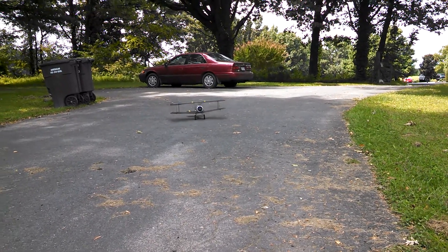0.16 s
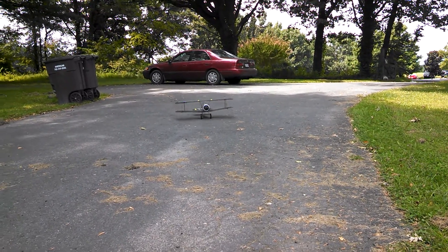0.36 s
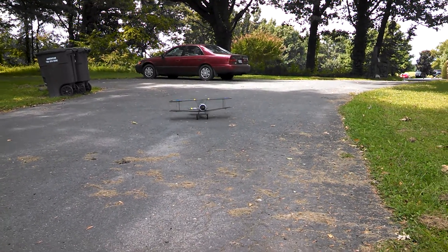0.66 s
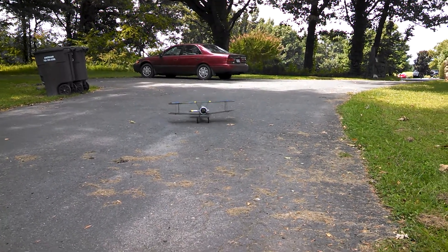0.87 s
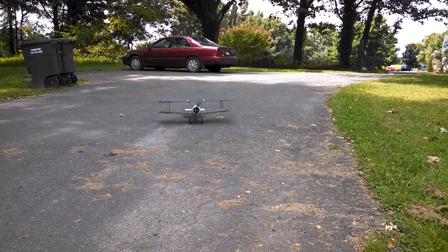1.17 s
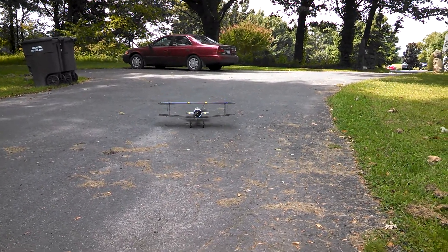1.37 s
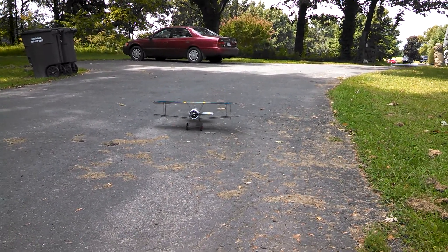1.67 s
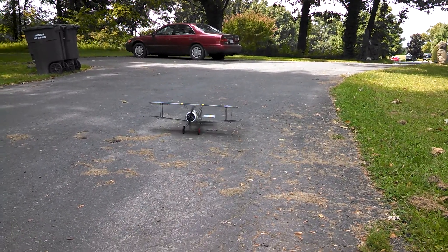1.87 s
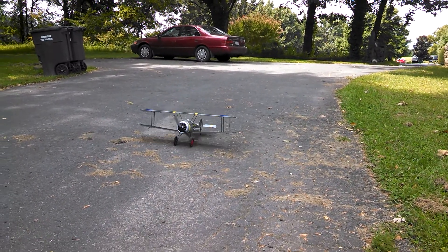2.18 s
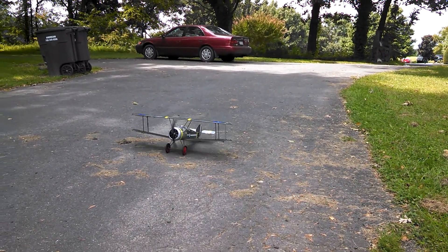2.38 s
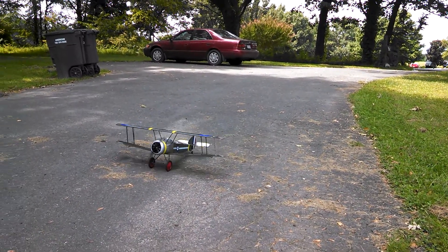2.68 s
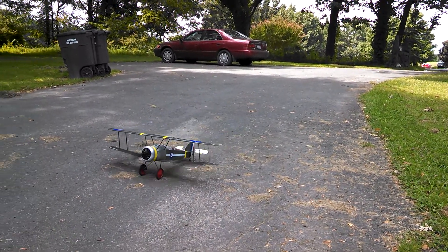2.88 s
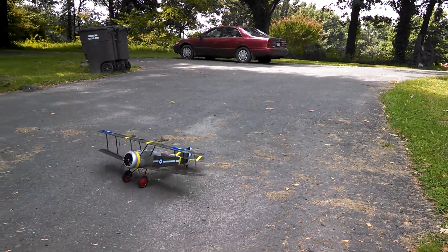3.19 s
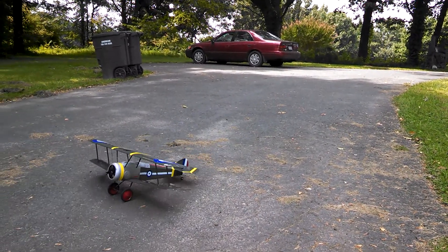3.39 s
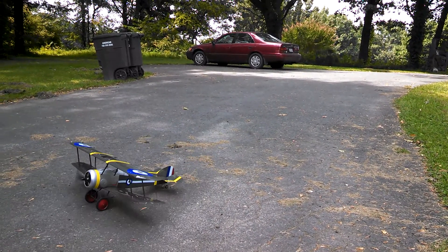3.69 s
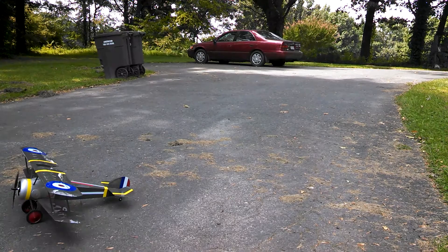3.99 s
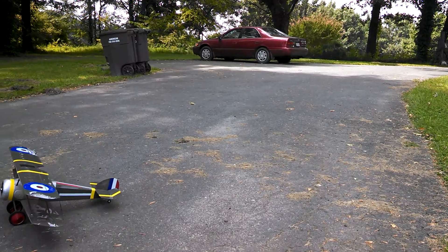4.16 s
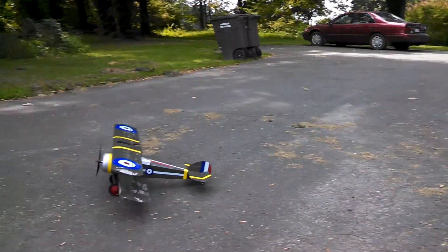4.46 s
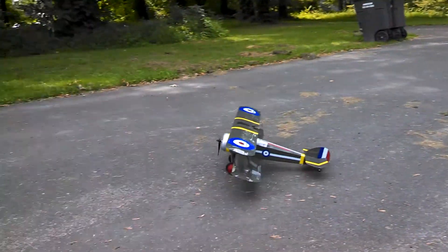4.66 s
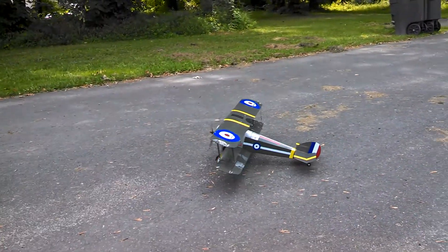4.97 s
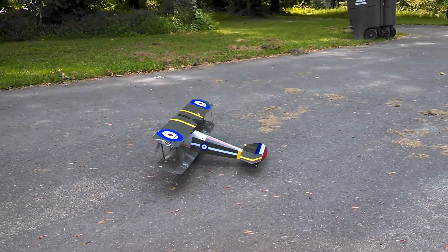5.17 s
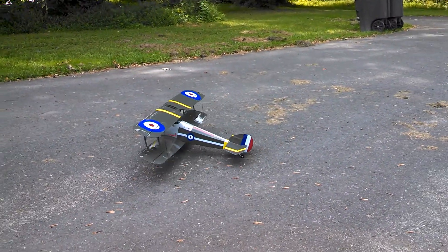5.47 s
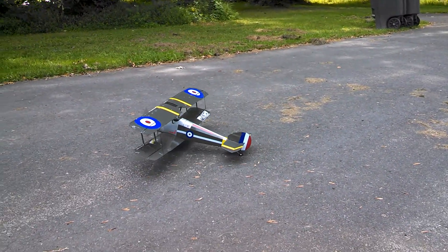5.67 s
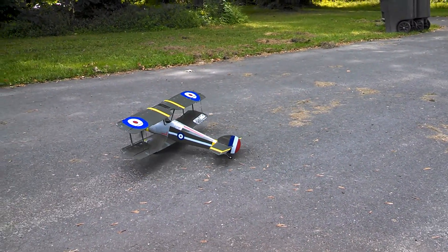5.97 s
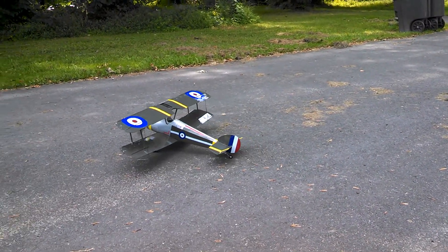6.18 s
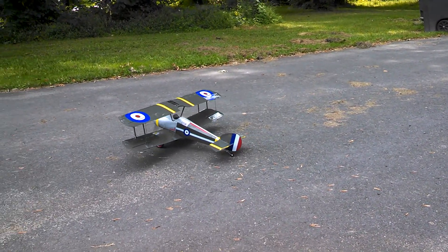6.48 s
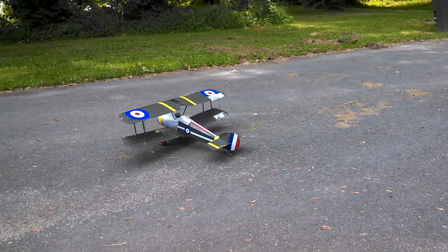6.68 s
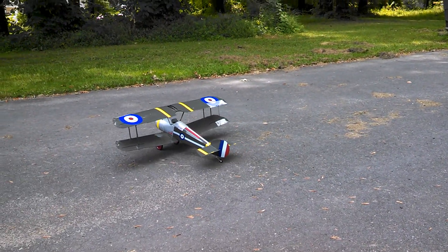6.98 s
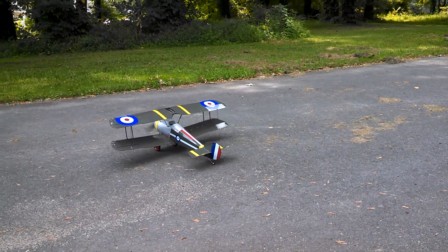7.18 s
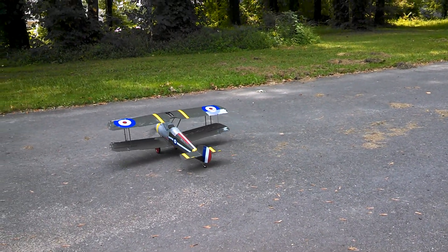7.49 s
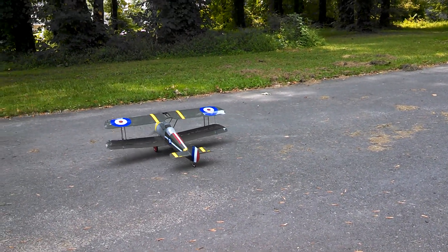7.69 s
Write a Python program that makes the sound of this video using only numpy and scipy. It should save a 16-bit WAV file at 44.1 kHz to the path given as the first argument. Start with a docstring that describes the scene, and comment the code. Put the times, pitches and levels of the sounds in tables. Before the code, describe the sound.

Toy-size propeller aircraft taxis closer and turns, thin steady whistle over wavering motor hum, amid sizzling insects, low wind thumps and two dry clicks.

```python
"""Electric model biplane taxiing

A model biplane taxis up a driveway and turns past a camera: its motor hums in slot and pole orders,
its speed controller whistles, propeller wash flaps on the wings and wheel bumps ring the light airframe.
Insects sizzle, one cicada pulses, another drones; wind rumbles on the microphone, two knocks hit the camera.
Gain control ducks the whole scene when the level passes a threshold, then lets it back slowly."""
import sys
import numpy as np
from scipy import signal
from scipy.fft import rfft, irfft, next_fast_len
from scipy.io import wavfile
from scipy.ndimage import uniform_filter1d

SR = 44100
rng = np.random.default_rng(int(sys.argv[2]) if len(sys.argv) > 2 else 0)


def waveform_to_disk(signal):
    """Save audio, clipped to [-1, 1], as 16-bit WAV at the path in sys.argv[1]."""
    frames = np.transpose(np.atleast_2d(signal))
    scaled = np.clip(frames, -1, 1) * 32767
    samples = np.round(scaled).astype(np.int16)
    wavfile.write(sys.argv[1], SR, samples)


N = 346185
TIME_S = np.arange(N) / SR

# levels in the tables are relative: filters, trims and gain control follow

# motor shaft rate: t/s, f/Hz
SHAFT_HZ = [(0.0, 31.3), (0.2, 31.0), (0.43, 27.3), (0.74, 33.3), (0.88, 29.6), (1.142, 30.4),
            (1.287, 27.6), (1.5, 26.3), (2.06, 14.6), (2.315, 23.3), (2.504, 29.6), (2.7, 32.5),
            (3.03, 34.3), (3.5, 26.6), (3.836, 25.2), (4.141, 28.7), (4.4, 30.3), (5.328, 29.9),
            (6.3, 31.8), (6.42, 37.4), (6.605, 40.6), (6.785, 41.7), (7.847, 37.9)]
# motor hum: t/s, level/dB
HUM_DB = [(0.0, -54), (0.45, -50.5), (0.8, -54), (1.1, -50), (1.38, -44), (1.55, -54), (2.25, -58),
          (2.42, -48), (2.58, -43), (3.1, -44), (3.45, -51.5), (3.9, -60), (4.12, -39.5), (4.4, -41),
          (5.0, -40.5), (5.46, -40.5), (5.8, -50), (6.24, -46.5), (6.34, -35.5), (6.5, -38), (6.65, -39),
          (7.0, -43), (7.85, -41.5)]
# hum orders, 12 slots and 14 poles: multiple of shaft rate, level/dB slow, level/dB fast
HUM_ORDERS = [(12, -9, -9.5), (13, -19, -6.5), (14, -4.5, -7), (16, -8, -24), (24, -30, -21),
              (28, -27, -14), (36, -3.5, -3), (42, -3.5, -16)]
# controller switching whistle: t/s, f/Hz
SWITCHING_HZ = [(0, 7792), (.95, 7820), (2, 7822), (2.8, 7794), (4.4, 7780), (6.3, 7776), (6.7, 7764),
                (7.85, 7761)]
# whistle as the aircraft turns: t/s, level/dB
WHISTLE_DB = [(0.0, -33), (0.42, -28.5), (0.7, -30.5), (0.87, -36), (1.35, -34.5), (1.68, -48), (1.96, -64),
              (2.1, -40), (2.38, -29), (2.5, -39), (2.62, -30), (2.9, -22), (3.2, -26.5), (3.35, -30.5),
              (3.47, -33), (3.58, -32), (3.72, -32), (3.95, -20.5), (4.12, -26), (4.25, -21), (4.4, -22.5),
              (4.55, -32), (4.75, -31), (4.9, -25), (5.03, -22.5), (5.14, -31.5), (5.28, -29),
              (5.74, -29.5), (5.95, -35), (6.44, -33), (6.75, -24.5), (7.05, -17), (7.28, -22),
              (7.6, -30.5), (7.84, -39)]
# rotor sidebands of the whistle: offset in shaft multiples, level/dB
ROTOR_SIDEBANDS = [(-21, -51), (4, -54), (14, -57), (42, -53)]
# sideband strength: t/s, level/dB
SIDEBAND_DB = [(0, -13), (1.9, -17), (2.3, 10), (3, 1), (4, -2), (4.5, -8), (6.2, 3), (6.8, 1), (7.85, -4)]
# nearness of the aircraft, heard in its wash: t/s, level/dB
NEARNESS_DB = [(0, -23), (2.0, -9.5), (3.2, 3.5), (4.2, 3), (5.5, -3.5), (6.7, -17), (7.85, -8.5)]
# propeller wash colour: f/Hz, level/dB
WASH_COLOUR = [(200, -9), (360, 3.5), (480, 6.5), (620, 2.5), (850, -9.5), (2000, -53), (4000, -90)]
# wheels rolling on asphalt: t/s, level/dB
ROLL_DB = [(0.0, -46), (0.45, -42.5), (1.0, -39), (1.9, -38), (2.5, -43.5), (3.15, -41.5), (3.7, -53),
           (4.25, -45), (4.95, -45.5), (5.3, -51), (6.2, -50), (6.9, -48.5), (7.85, -50)]
# airframe resonances: f/Hz, width/Hz, level/dB
AIRFRAME_MODES = [(541, 122, 16.5), (1216, 376, 9), (1472, 146, 9.5), (1710, 310, 7.5), (2040, 150, -53),
                  (3355, 180, 9.5), (7640, 1700, 7.5), (16300, 5300, 1.5)]
# wheels striking grit: t/s, undercarriage clack level/dB, sharp snap level/dB
GRIT_JOLTS = [(0.3799, -27.5, -23), (0.694, -31.5, -37), (0.817, -29, -38), (0.993, -36, -35),
              (1.1957, -33, -52), (1.4516, -30.5, -39), (1.556, -30, -35), (1.704, -33, -25),
              (2.3014, -30, -27), (2.51, -31, -29), (2.667, -29, -24), (2.8863, -33, -40),
              (3.085, -27.5, -50), (3.155, -33, -35), (3.176, -34, -19), (3.191, -33.5, -28),
              (3.235, -40, -23.5), (3.343, -34.5, -42), (3.493, -32, -24), (3.607, -34.5, -41),
              (3.813, -38.5, -31), (4.125, -27, -41), (4.2322, -28, -44), (4.276, -31, -43.5),
              (4.6328, -29, -39), (4.736, -29, -43), (4.949, -28, -37)]
# grit snap colour: f/Hz, level/dB
SNAP_COLOUR = [(800, -19), (3000, -2), (7000, 8), (15000, -8)]
# near cicada accents: middle t/s, rise in level/dB
CICADA_ACCENTS = [(0.137, 10.5), (0.742, 13), (1.34, 13), (1.937, 12.5), (2.523, 12.5), (3.099, 11.5),
                  (3.46, 6.5), (3.99, 7.5), (4.556, 15.5), (5.098, 14.5), (5.625, 14.5), (6.195, 10.5),
                  (6.769, 13)]
# near cicada drum partials: multiple of click rate, level/dB
DRUM_PARTIALS = [(9, -11), (10, -3.5), (11, -11), (12, -8), (13, -6), (14, -20)]
# near cicada rasp: t/s, level/dB
RASP_DB = [(0.0, -25.5), (0.2, -33.5), (0.55, -28), (0.87, -35.5), (1.15, -28.5), (1.8, -32), (2.3, -30),
           (2.6, -35), (3.0, -28.5), (3.22, -42), (3.55, -36), (3.85, -33.5), (4.15, -30), (4.55, -30),
           (4.9, -31), (5.3, -33.5), (6.2, -33), (6.9, -35), (7.85, -50)]
# belly resonance shape: offset from centre f/Hz, level/dB
BELLY_SHAPE = [(20, 6.5), (250, -1), (500, -7), (900, -7.5), (1500, -40.5), (2200, -54)]
# partials singing in the rasp: multiple of click rate, level/dB against the rasp
SINGING_PARTIALS = [(16, -14), (17, -8), (18, -8), (19, -11.5), (20, -23.5)]
# far cicada drone: t/s, level/dB
DRONE_DB = [(0, -59), (3.9, -46), (4.4, -33), (5.2, -36.5), (6.0, -39), (6.7, -40), (7.85, -40)]
# far cicada colour: f/Hz, level/dB
FAR_COLOUR = [(3000, -56), (3520, -18), (3660, 0), (3830, -13), (4020, -6.5), (4400, -9.5), (4950, -11.5),
              (5120, -2.5), (5400, 2), (6500, -38)]
# insect chorus: t/s, level/dB
CHORUS_DB = [(0.0, -32), (1.0, -33.5), (1.7, -34), (2.9, -31), (3.22, -39), (3.5, -35.5), (4.4, -34),
             (5.0, -33), (5.8, -35), (7.15, -32.5), (7.85, -36.5)]
# chorus colour: f/Hz, level/dB
SIZZLE_COLOUR = [(2500, -78), (3300, -1.5), (4200, -2.5), (5000, 1), (5700, 7.5), (6400, 7), (7200, 4),
                 (8400, -5.5), (10000, -12.5), (13000, -33), (15300, -10.5)]
# outdoor background colour: f/Hz, level/dB
RUSH_COLOUR = [(30, -1), (80, -13), (250, -1), (550, -2.5), (800, -7.5), (1400, -6.5), (2500, -37.5),
               (5000, -102), (15000, -9.5)]
# breeze on the microphone: t/s, level/dB
BREEZE_DB = [(0.0, -40), (0.4, -35), (0.65, -18), (1.0, -27), (1.6, -26), (2.1, -26), (2.8, -26.5),
             (3.2, -45.5), (3.7, -29), (4.25, -27), (4.9, -33), (5.3, -35.5), (5.75, -13), (6.25, -27),
             (6.8, -38), (7.25, -31.5), (7.85, -36.5)]
# gusts swelling out of the breeze: t/s, half length/s, level/dB
WIND_GUSTS = [(0.213, 0.014, -36), (0.317, 0.012, -38), (0.539, 0.031, -20.5), (0.676, 0.018, -16),
              (0.798, 0.052, -10.5), (0.917, 0.013, -7), (1.065, 0.028, -20.5), (1.131, 0.024, -17),
              (1.364, 0.03, -19), (1.498, 0.037, -15.5), (1.67, 0.041, -33), (1.857, 0.031, -14.5),
              (2.045, 0.084, -10.5), (2.268, 0.033, -13.5), (2.533, 0.059, -26), (3.085, 0.04, -29),
              (3.3, 0.12, -33), (3.723, 0.034, -33), (3.83, 0.014, -35), (4.026, 0.049, -7.5),
              (4.142, 0.011, -5.5), (4.299, 0.022, -10), (4.484, 0.018, -38), (4.63, 0.02, -21),
              (4.75, 0.019, -18), (4.887, 0.02, -31), (5.083, 0.061, -31), (5.461, 0.021, -8),
              (5.629, 0.066, -10), (5.916, 0.032, -18.5), (6.042, 0.031, -16.5), (6.252, 0.0099, -24),
              (6.381, 0.045, -8.5), (7.133, 0.034, -10.5), (7.422, 0.036, -11), (7.606, 0.054, -21.5),
              (7.69, 0.028, -28.5)]
# hardest buffets: t/s, flap level/dB, half length/s, brighter slap level/dB
WIND_BUFFETS = [(0.784, -12, .009, -42), (1.887, -14, 0.0075, -36), (1.991, -7.5, 0.013, -30.5),
                (2.255, -13.5, 0.013, -31.5), (4.007, -10.5, 0.015, -28.5), (4.043, -2, 0.0049, -25),
                (5.465, -22.5, .006, -44), (5.526, -14.5, .004, -42), (5.605, -6.5, 0.0082, -29),
                (5.619, -4, 0.0041, -13.5), (6.36, -18.5, 0.0081, -39)]
# wind rumble colour: f/Hz, level/dB
RUMBLE_COLOUR = [(20, -36), (30, -30), (45, 2.5), (60, 6), (100, 2), (160, -6.5), (250, -16.5),
                 (400, -25.5), (700, -55.5), (1500, -78)]
# buffet flap and slap colours: f/Hz, level/dB
FLAP_COLOUR = [(50, -88), (150, 13.0), (300, 1.0), (500, -14.5), (900, -42), (5000, -86)]
SLAP_COLOUR = [(200, -20), (420, 3.5), (650, -5), (1000, -20), (2200, -37), (5000, -85)]
# knocks on the camera: t/s, thump level/dB, thump f/Hz, decay length/s, click level/dB
CAMERA_KNOCKS = [(3.3975, -9.5, 900, .002, -20), (7.081, -5, 900, .0011, -5.5)]
# camera case modes: f/Hz, level/dB
CASE_MODES = [(1600, -7), (4000, -3), (4950, -5), (6300, -3), (7550, -2), (9400, -12)]
# stereo balance by frequency: f/Hz, left minus right level/dB
STEREO_BALANCE = [(200, -2), (400, 0), (700, 1), (1300, -1.5), (2000, -5.5), (2500, 0), (3000, 0),
                  (3450, -3.5), (4400, -1.2), (5500, -1.5), (6100, -3.5), (7900, -3.2), (9200, -2),
                  (10000, -.3)]

TAXI_HZ = 30  # shaft rate at which the wash takes its base level
CICADA_DB = -47  # drum buzz between accents
SWELL_S, ACCENT_S, BELLY_LAG_S = 0.089, .085, .012  # half lengths of swell and stretch; stretch delay
PORT_LAG_SAMPLES, WASH_LAG_SAMPLES = 16, 27
LIMIT_DB, SENSE_S, RECOVER_DB_PER_S, REACT_S = -24.5, 0.0022, 10, .00025  # gain control
TOP_HZ = 15400


def undb(db):
    """Decibels to gain."""
    return 10 ** (np.asarray(db) / 20)


def curve(table):
    """Join rows (t/s, value) by straight lines."""
    return np.interp(TIME_S, *np.transpose(table))


def unit(x):
    """Scale to rms 1."""
    return x / np.sqrt(np.mean(x ** 2))


def even(x, size):
    """Hold rms near 1 over a sliding window of samples."""
    return x / np.sqrt(uniform_filter1d(x ** 2, size=size))


def walk(rate_hz):
    """Smooth random wander of rms 1: held random steps, averaged twice."""
    hold = max(int(SR / rate_hz), 1)
    steps = np.repeat(rng.standard_normal(N // hold + 1), hold)
    return unit(uniform_filter1d(uniform_filter1d(steps, hold), hold)[:N])


def noise(colour):
    """Noise of rms 1 with its spectrum drawn through (f/Hz, level/dB) points."""
    size = next_fast_len(N)
    hz, db = np.transpose(colour)
    gain = undb(np.interp(np.log(np.fft.rfftfreq(size, 1 / SR) + 1), np.log(hz), db))
    return unit(irfft(rfft(rng.standard_normal(size)) * gain, size)[:N])


def ring(x, hz, width_hz):
    """One resonance, gain 1 at its centre."""
    return signal.lfilter(*signal.iirpeak(min(hz, SR / 2 - 1), hz / width_hz, fs=SR), x)


def turn(hz):
    """Running phase (rad) of a changing frequency."""
    return 2 * np.pi * np.cumsum(hz) / SR


def bump(t_s, half_s, order=2):
    """Smooth swell to 1 around a moment; higher order flattens the top."""
    return np.exp(-np.minimum(np.abs(TIME_S - t_s) / half_s, 6) ** order)


def fade(x, decay_s):
    """Give every impulse an exponential tail."""
    return signal.lfilter([1], [1, -np.exp(-1 / (decay_s * SR))], x)


def ports(x, lag_samples=PORT_LAG_SAMPLES):
    """Camera stereo widening: second channel is inverted and late."""
    return np.array([x, -np.roll(x, lag_samples)])


def motor(whistle_db=-2.5, fading_db=3.0, flutter_db=2.5, slow_hz=32, fast_hz=38, chop=0.16):
    """Magnetic hum on shaft orders plus switching whistle, blade-chopped, with rotor sidebands."""
    speed_hz = curve(SHAFT_HZ)
    shaft = turn(speed_hz * (1 + .0015 * walk(25) + .003 * walk(250)))
    fast = np.clip((speed_hz - slow_hz) / (fast_hz - slow_hz), 0, 1)
    hum = 0
    for order, slow_db, fast_db in HUM_ORDERS:
        db = slow_db + fast * (fast_db - slow_db) + 2 * walk(30)
        hum = hum + undb(db) * np.sin(order * shaft + rng.uniform(0, 2 * np.pi))
    hum = hum * (1 + .12 * np.cos(shaft) + .15 * walk(200))  # wobble once a turn, plus roughness

    switching = turn(curve(SWITCHING_HZ) + 0.6 * walk(9.9))
    whistle_gain = undb(curve(WHISTLE_DB) + whistle_db + fading_db * walk(14))
    whistle = np.sin(switching) * (1 + chop * np.cos(2 * shaft)) * whistle_gain
    sidebands = 0
    for offset, db in ROTOR_SIDEBANDS:
        sidebands = sidebands + undb(db + flutter_db * walk(17)) * np.sin(switching + offset * shaft)
    return hum * undb(curve(HUM_DB)) + whistle + sidebands * undb(curve(SIDEBAND_DB))


def propeller(wash_db=-48, chop=0.36, db_per_octave=14):
    """Two-blade wash flapping on the wings; grows with shaft speed and nearness."""
    speed_hz = curve(SHAFT_HZ)
    blades = 1 + chop * np.cos(2 * turn(speed_hz))
    speed_db = db_per_octave * np.log2(speed_hz / TAXI_HZ)
    return noise(WASH_COLOUR) * blades * undb(wash_db + speed_db + curve(NEARNESS_DB))


def airframe(push):
    """Light wings and fuselage ring in parallel modes with every push from the wheels."""
    return sum(undb(db) * ring(push, hz, width_hz) for hz, width_hz, db in AIRFRAME_MODES)


def wheels(roll_db=1.5, bumps_per_s=260, scatter_db=3.0, grit_s=0.0084, jolt_s=0.01, snap_s=0.0023):
    """Dense asphalt bumps ring the airframe; single jolts snap and clack the undercarriage."""
    bump_gain = undb(scatter_db * np.minimum(rng.exponential(size=N), 4))
    bumps = (rng.random(N) < bumps_per_s / SR) * bump_gain
    rolling = unit(airframe(fade(bumps, grit_s) * rng.standard_normal(N)))
    blows, snaps = np.zeros((2, N))
    for t_s, clack_db, snap_db in GRIT_JOLTS:
        blows[int(t_s * SR)] = undb(clack_db)
        snaps[int(t_s * SR)] = undb(snap_db)
    clatter = airframe(fade(blows, jolt_s) * rng.standard_normal(N))
    return rolling * undb(curve(ROLL_DB) + roll_db) + clatter + fade(snaps, snap_s) * noise(SNAP_COLOUR)


def accents(half_s, order=2):
    """Near 1 while the cicada's belly is stretched in an accent, falling to 0 away from it."""
    return sum(bump(t_s + BELLY_LAG_S, half_s, order=order) for t_s, _ in CICADA_ACCENTS)


def cicada(click_hz=365, sag_hz=6.5, rough=.01, steadying=0.4526, high_hz=5850, low_hz=4330,
           cavity_width_hz=190, cavity_db=9, rasp_db=-5.0, rasp_dip_db=7.5, grain=0.49, flutter_db=1.5):
    """Drum clicks rasp through the belly's resonance, which droops and swoops back in each accent."""
    stretch = accents(ACCENT_S, order=3)
    swell_db = sum(db * bump(t_s, SWELL_S) for t_s, db in CICADA_ACCENTS)
    # click rate starts an accent high, then sags
    sag = sum(bump(t_s - .065, .03) - bump(t_s + 0.0542, .06) for t_s, _ in CICADA_ACCENTS)
    jitter = rough * (1 - steadying * stretch) * (walk(60) + 1.5 * walk(400))
    clicks = turn((click_hz + sag_hz * sag) * (1 + jitter))
    cavity_hz = high_hz + (low_hz - high_hz) * stretch

    def partial(multiple, db):
        """One fluttering multiple of the click rate."""
        tone = np.sin(multiple * clicks + rng.uniform(0, 2 * np.pi))
        return undb(db + flutter_db * walk(90)) * tone

    buzz = 0
    for multiple, db in DRUM_PARTIALS:
        detune = (multiple * click_hz - cavity_hz) / cavity_width_hz
        buzz = buzz + partial(multiple, db + cavity_db / (1 + detune ** 2))

    # noise rides on the resonance and pulses with the clicks; singing partials drop out in accents
    cavity = turn(cavity_hz)
    carrier = noise(BELLY_SHAPE) * np.sin(cavity) + noise(BELLY_SHAPE) * np.cos(cavity)
    rasp = unit(carrier * (1 + grain * np.cos(clicks)))
    rasp = rasp + (1 - stretch) * sum(partial(multiple, db) for multiple, db in SINGING_PARTIALS)
    rasp_gain = undb(curve(RASP_DB) + rasp_db - rasp_dip_db * stretch + walk(70))
    return buzz * undb(CICADA_DB + swell_db) + rasp * rasp_gain


def far_cicada(flutter_db=1.0):
    """Hoarse drone without accents: coloured noise with a fluttering level."""
    return noise(FAR_COLOUR) * undb(curve(DRONE_DB) + flutter_db * walk(60))


def trees(chorus_db=-3.0, spread_db=-11, air_db=-8, around_air_db=-2.5, dip_db=6.0, dip_s=0.022):
    """Insects blend into a sizzle, dipping at each cicada accent, over an outdoor rush."""
    rush = undb(curve(CHORUS_DB))
    level = undb(curve(CHORUS_DB) - dip_db * accents(dip_s))
    sizzle = noise(SIZZLE_COLOUR) * undb(0.99 * walk(70))
    middle = level * sizzle + undb(air_db) * rush * noise(RUSH_COLOUR)
    # independent noise in each channel
    around = np.array([level * noise(SIZZLE_COLOUR) + undb(around_air_db) * rush * noise(RUSH_COLOUR)
                       for _ in range(2)])
    return (ports(middle) + undb(spread_db) * around) * undb(chorus_db)


def wind(wind_db=-1.0, gusty_db=3.5, lull_db=2.25):
    """Eddies rumble on the microphone, swelling in gusts; the hardest flap with a brighter slap."""
    gusts = sum(undb(db) * bump(t_s, half_s) for t_s, half_s, db in WIND_GUSTS)
    strength = undb(curve(BREEZE_DB) + lull_db * walk(5.3)) + gusts
    eddies = unit(even(noise(RUMBLE_COLOUR), size=SR // 16) * undb(gusty_db * walk(60)))
    rumble = eddies * strength * undb(wind_db)
    flaps = sum(undb(db) * bump(t_s, half_s) for t_s, db, half_s, _ in WIND_BUFFETS)
    slaps = sum(undb(db) * bump(t_s, half_s) for t_s, _, half_s, db in WIND_BUFFETS)
    flap = even(noise(FLAP_COLOUR), size=SR // 100)
    slap = even(noise(SLAP_COLOUR), size=SR // 200)
    # tanh flattens the strongest rumble swings
    pressure = np.tanh(rumble) + flaps * flap + slaps * slap
    return signal.sosfilt(signal.butter(3, 1100, fs=SR, output="sos"), pressure)


def knocks():
    """Dry thump plus a snap of the camera's case, at full level at once, with Gaussian decay."""
    out = np.zeros(N)
    age_s = np.arange(SR // 20) / SR
    for t_s, thump_db, thump_hz, length_s, click_db in CAMERA_KNOCKS:
        thump = undb(thump_db) * np.sin(2 * np.pi * thump_hz * age_s)
        case = sum(undb(db) * np.sin(2 * np.pi * hz * age_s) for hz, db in CASE_MODES)
        snap = case + .4 * rng.standard_normal(len(age_s))
        start = int(t_s * SR)
        decay = np.exp(-(age_s / length_s) ** 2)
        out[start:start + len(age_s)] += (thump + undb(click_db) * snap) * decay
    return out


def lean(pair):
    """Tilt the stereo picture by frequency, mostly in favour of the right."""
    size = next_fast_len(N)
    db = np.interp(np.fft.rfftfreq(size, 1 / SR), *np.transpose(STEREO_BALANCE))
    return irfft(rfft(pair, size) * undb(np.array([db, -db]) / 2), size)[:, :N]


def gain_control(x):
    """Gain drops almost at once when the channel mean passes the threshold, then creeps back."""
    keep = np.exp(-1 / (SENSE_S * SR))
    power = signal.lfilter([1 - keep], [1, -keep], x.mean(axis=0) ** 2)
    over_db = np.maximum(10 * np.log10(power + 1e-12) - LIMIT_DB, 0)
    recovered_db = RECOVER_DB_PER_S * TIME_S
    # peak hold that falls at the recovery rate
    duck_db = np.maximum.accumulate(over_db + recovered_db) - recovered_db
    return x * undb(-np.interp(TIME_S - REACT_S, TIME_S, duck_db))


def scene():
    """Aircraft, insects and wind reach the left port first, the knocks the right one."""
    shared = motor() + wheels() + cicada() + far_cicada() + wind()
    pair = ports(shared) + ports(propeller(), WASH_LAG_SAMPLES) + trees() + ports(knocks())[::-1]
    return lean(pair)


def record(dry):
    """Camera: duck loud moments, clip the highest peaks, cut the top."""
    clipped = np.clip(gain_control(dry), -.85, .85)
    return signal.sosfilt(signal.ellip(8, .2, 70, TOP_HZ, fs=SR, output="sos"), clipped)


dry = scene()
out = record(dry)
waveform_to_disk(out)
```